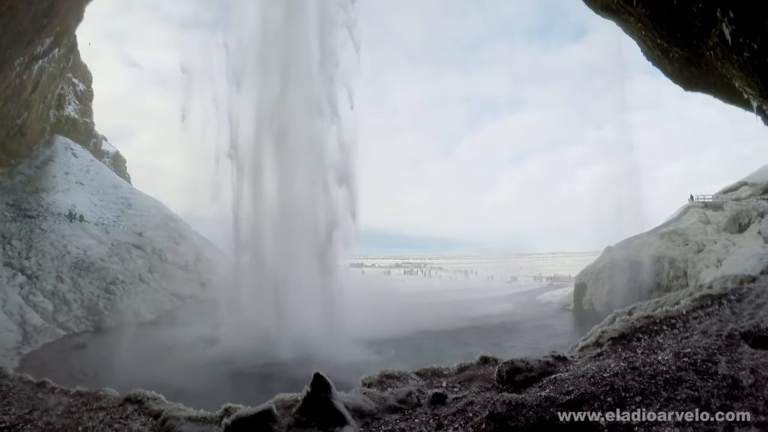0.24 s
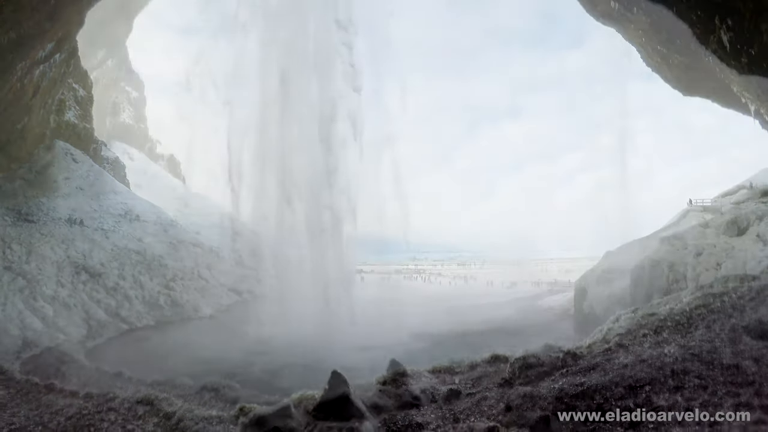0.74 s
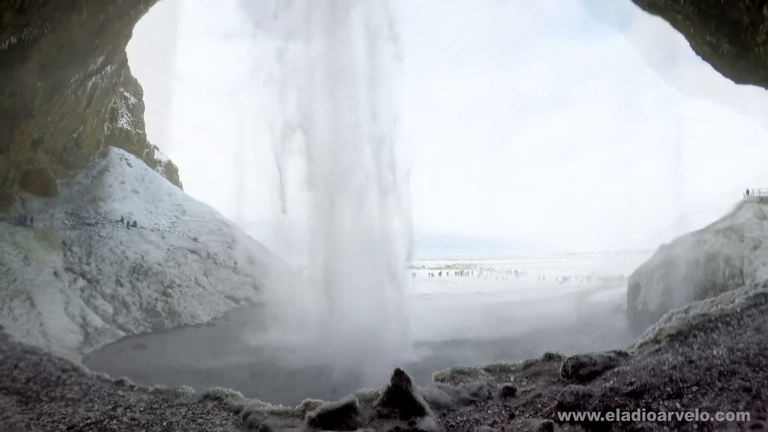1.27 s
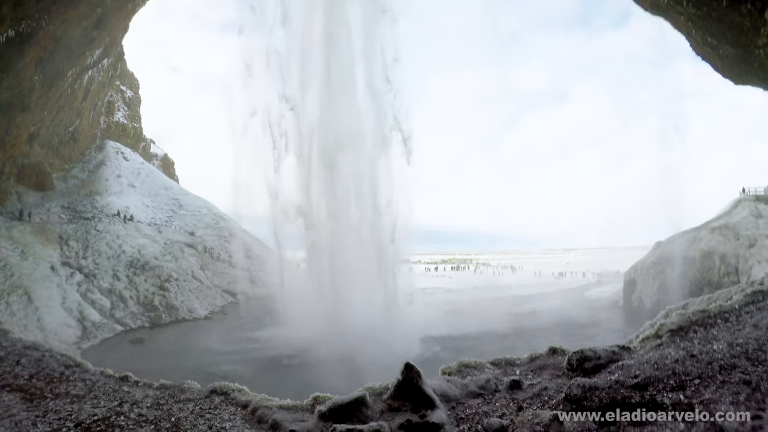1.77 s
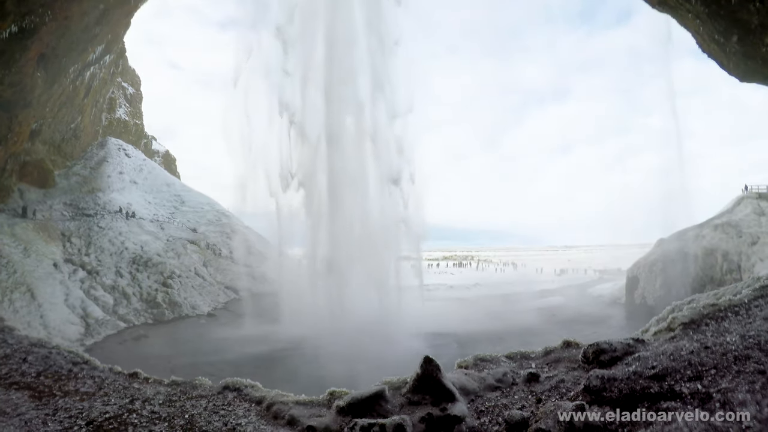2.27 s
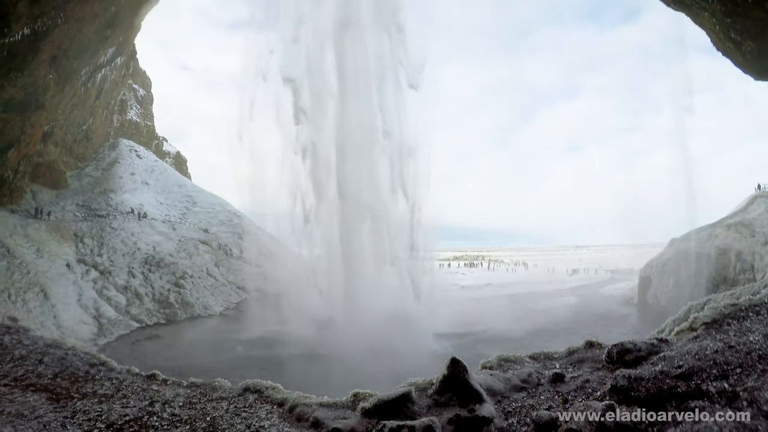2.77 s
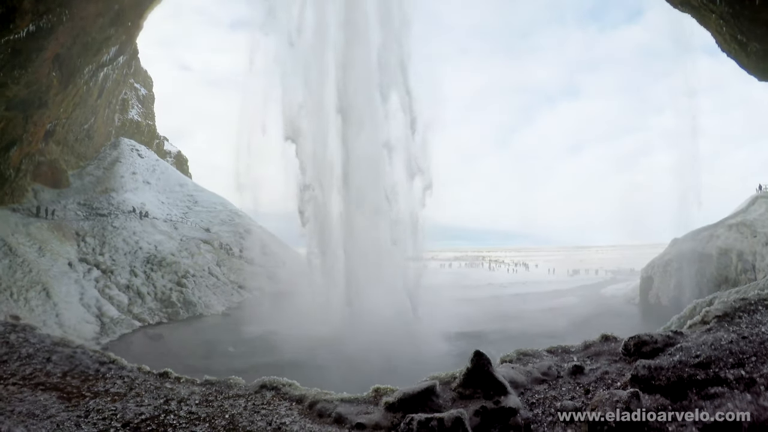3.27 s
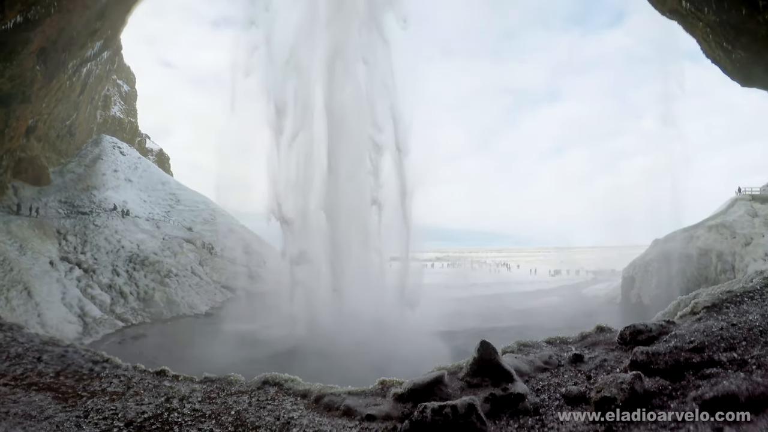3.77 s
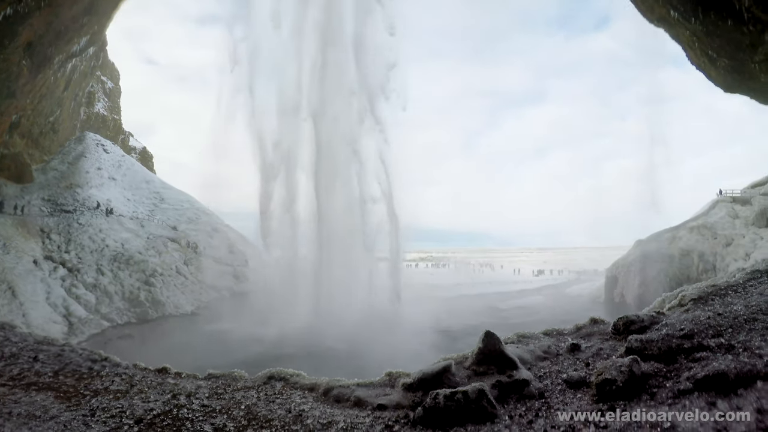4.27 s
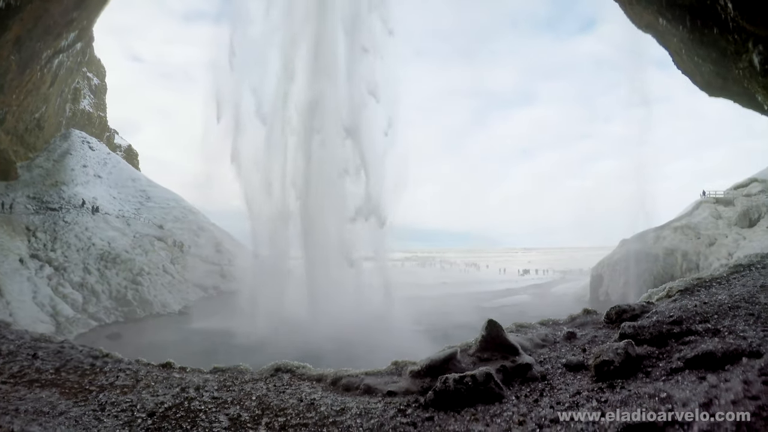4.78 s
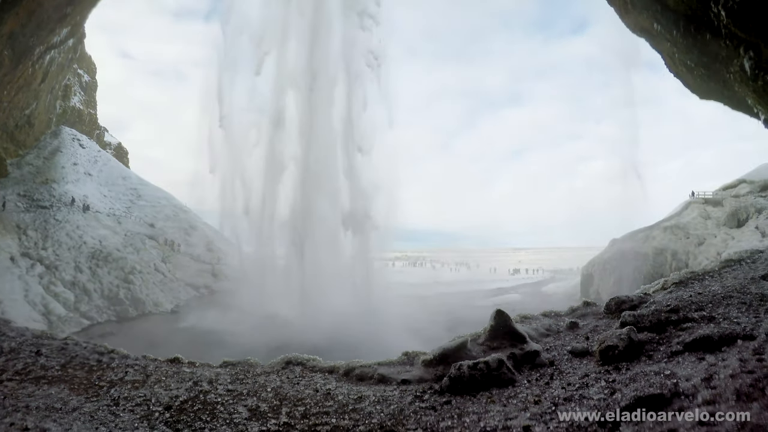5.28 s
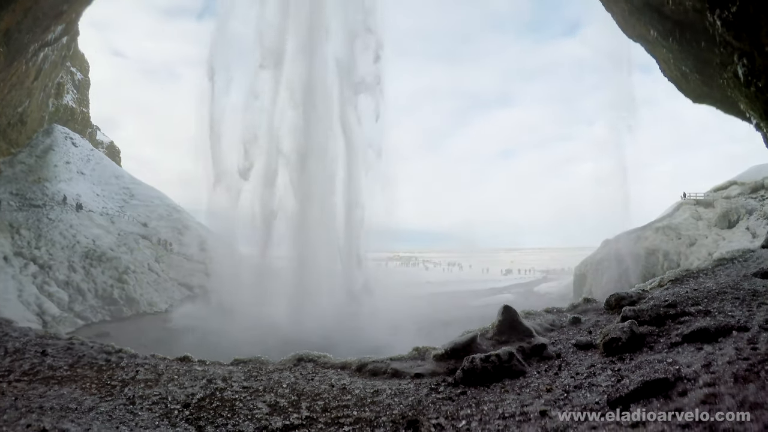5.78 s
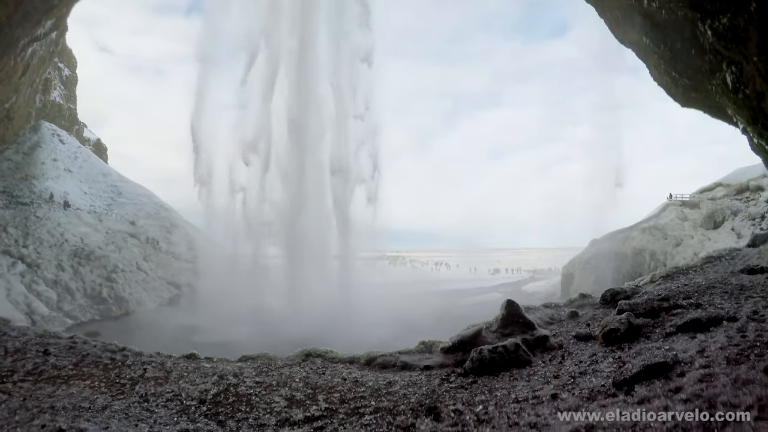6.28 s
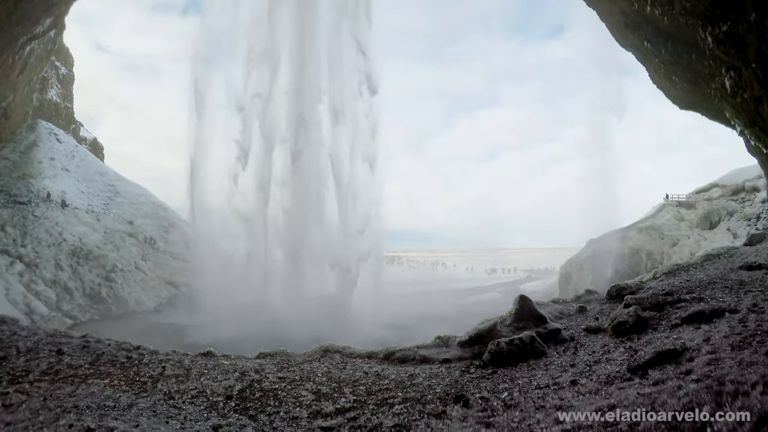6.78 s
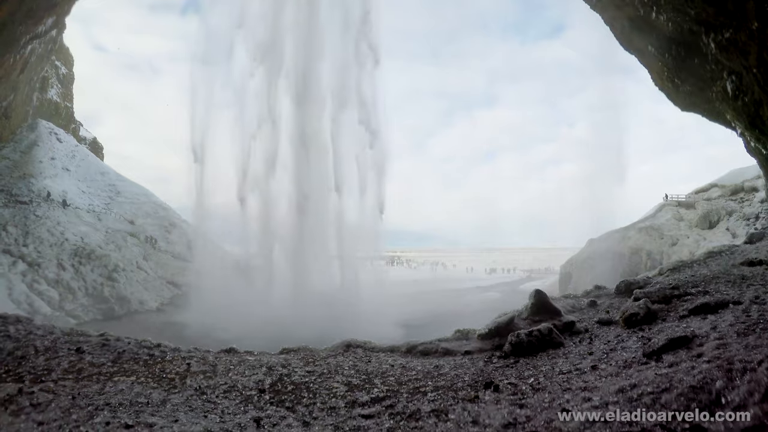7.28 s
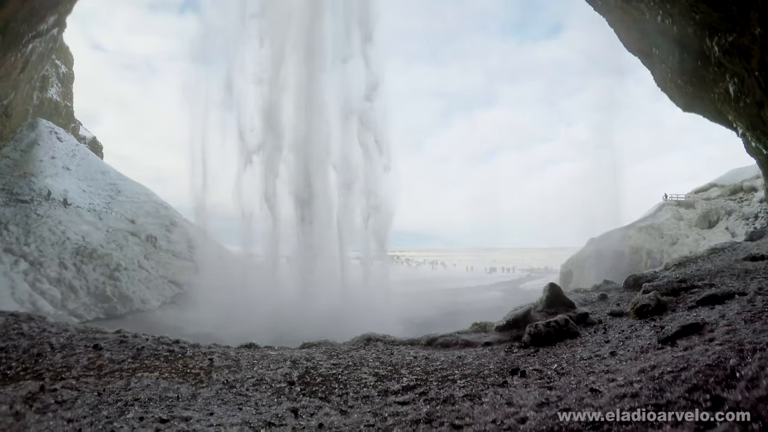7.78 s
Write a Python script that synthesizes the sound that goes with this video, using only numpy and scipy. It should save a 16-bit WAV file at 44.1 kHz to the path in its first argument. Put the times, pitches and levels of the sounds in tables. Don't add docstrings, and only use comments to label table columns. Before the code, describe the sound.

From a rocky hollow behind a tall waterfall, water pours without pause into a pool. Deep, boomy rumble dominates, thumping and churning irregularly, while a softer, steady rush and hiss lies above. Just before one second a drop knocks hard on the microphone's case; a big bass swell follows around two seconds. Sound is close, slightly muffled and channelled, mono, with little extreme treble.

```python
import sys
import numpy as np
from scipy import signal
from scipy.fft import rfft, irfft, next_fast_len
from scipy.io import wavfile
from scipy.ndimage import uniform_filter1d

SR = 44100
rng = np.random.default_rng(int(sys.argv[2]) if len(sys.argv) > 2 else 0)


def convert_level_to_amplitude(level_db):
    exponent = np.asarray(level_db, float) / 20
    return 10 ** exponent


def unload_audio(sound):
    columns = np.transpose(np.atleast_2d(sound))
    steps = np.round(np.clip(columns, -1, 1) * 32767)
    wavfile.write(sys.argv[1], SR, steps.astype(np.int16))


N = 354563
PADDED = next_fast_len(N)
HZ = np.maximum(np.fft.rfftfreq(PADDED, 1 / SR), 1)
CHANNEL_HZ = 48000 / 512

# [f/Hz, density/dB]
POOL_SPECTRUM = [(3.5, -27), (6.0, -6.5), (27, -1.5), (87, -3), (166, -12.5), (216, -11.5), (253, -16.5),
                 (313, -17), (400, -25.5), (520, -40), (880, -120)]
# [f/Hz, density/dB]
SHEET_SPECTRUM = [(820, -15.5), (1400, -1), (1520, -1), (3440, -4.5), (4040, -2.5), (6150, -4.5),
                  (6790, -6.5), (7660, -13), (8470, -15), (9640, -27), (11100, -30.5), (12600, -28),
                  (14700, -34), (15300, -38)]
# [f/Hz, level/dB]
CASE_RESPONSE = [(469, -3.5), (562, -16.5), (656, -8.5), (750, -3), (844, -2.5), (937, -4.5), (1031, -11),
                 (1125, -16.5), (1219, -6.5), (1312, -3), (1406, -.5), (1500, 0)]
# [t/s, peak level/dB]
CASE_DROPS = [
    (.738, -39),
    (.9075, -9),
    (2.53, -32),
    (2.793, -31),
    (6.526, -34),
    (6.949, -38),
]
# [f/Hz, width/Hz, level/dB]
HOLLOW_MODES = [
    (16.8, 7.7, -8.5),
    (52.8, 10, -7),
    (88.85, 7.9, -1),
    (143.3, 10.2, -13.5),
    (211, 28, -18.5),
]
# [t/s, flow level/dB, fineness/dB]
SHEET_FLOW = [(0, -29, 1.3), (.3, -28.5, 0), (.48, -31.5, 0.3), (.72, -31, 2.5), (.95, -28, -2),
              (1.4, -29.5, -0.5), (1.85, -30, -1), (2.6, -28.5, -2.5), (3.3, -29.5, -2), (3.8, -29.5, -2),
              (4.02, -30.5, -1), (4.25, -28.5, -2), (4.68, -29.5, -1), (4.9, -30, -2.5), (5.3, -30.5, -0.6),
              (6.1, -30.5, -1.3), (7.0, -30, -0.6), (8.04, -31, -2.7)]
# [t/s, weight/dB]
PLUNGE_WEIGHT = [(0, -0.5), (.9, 2), (2.5, 1.5), (3.4, 1.5), (4.1, -2), (4.9, 0.5), (6.2, -2), (7.2, -0.5),
                 (7.75, 3), (8.04, -1)]
# [mean level/dB, share of flow/1, share of fineness/1, share of weight/1]
SHEET_MIX = [
    (-39, 0.88, -0.11, 0.33),
    (-30.5, 0.95, 0.14, -0.011),
    (-31, .99, 0.77, 0.051),
    (-52.5, .9, 0.084, -.2),
]
# [centre f/Hz, mean level/dB, share of flow/1, share of weight/1]
POOL_MIX = [
    (38, -17, .11, -0.13),
    (87, -22.5, 0.099, -0.04),
    (167, -24, .11, 1.1),
    (310, -31.5, .3, 0.48),
]
# [t/s, pitch f/Hz, swell level/dB]
AIR_CLOUDS = [(.17, 310, 5), (.3, 38, 6), (.42, 87, 1.5), (.58, 310, 1), (.9, 130, 5), (1.36, 38, 3),
              (1.45, 200, 2.5), (1.75, 38, 3.5), (1.85, 310, 4.5), (2.08, 87, 10), (2.36, 109, 5),
              (2.68, 50, 0.5), (3.15, 38, 2), (3.37, 59.5, 7.5), (3.52, 87, -1), (4.04, 87, 2),
              (4.38, 38, 2), (4.72, 38, 5), (4.73, 310, 4), (4.85, 100, 3.5), (5.26, 38, 5),
              (5.55, 70, 1.5), (5.93, 55, -1), (6.42, 87, 5), (6.6, 310, 0), (6.9, 38, 3), (7.03, 87, 7.5),
              (7.3, 70, 7), (7.65, 87, 6), (7.9, 45, 7)]


def rms_one(x):
    return x / np.sqrt(np.mean(x ** 2) + 1e-20)


def in_time(rows):
    s, *columns = np.transpose(rows)
    return [np.interp(np.arange(N) / SR, s, column) for column in columns]


def at_hz(points, hz):
    table = np.array(points)
    return np.interp(np.log(hz), np.log(table[:, 0]), table[:, 1])


def shape(x, gain):
    return irfft(rfft(x, PADDED) * gain, PADDED)[:N]


def stepped(points, soft_hz):
    centre = np.maximum(np.round(HZ / CHANNEL_HZ), 1) * CHANNEL_HZ
    return uniform_filter1d(at_hz(points, centre), max(1, int(soft_hz * N / SR)))


def split(x, edges_hz):
    lows = [0] + [shape(x, 1 / (1 + (HZ / hz) ** 12)) for hz in edges_hz] + [x]
    return [rms_one(high - low) for low, high in zip(lows, lows[1:])]


def drift(rate_hz):
    step = 40
    r = np.exp(-80 * np.pi * rate_hz / SR)
    noise = rng.standard_normal(N // step + 2002)
    slow = signal.lfilter([1], [1, -2 * r, r * r], noise)[2000:]
    return np.interp(np.arange(N) / step, np.arange(len(slow)), rms_one(slow))


def patches(gain_db, edges_hz, rate_hz, own_db, shared_db):
    spectrum = rfft(rng.standard_normal(PADDED)) * convert_level_to_amplitude(gain_db)
    together = drift(rate_hz)
    out = 0
    for tent in np.eye(len(edges_hz)):
        weight = np.interp(np.log(HZ), np.log(edges_hz), tent)
        band = irfft(spectrum * weight, PADDED)[:N]
        out = out + band * convert_level_to_amplitude(own_db * drift(rate_hz) + shared_db * together)
    return out


def controls():
    return [c - c.mean() for c in in_time(SHEET_FLOW) + in_time(PLUNGE_WEIGHT)]


def pool_levels():
    swell_s, reach_octaves = 0.069, 0.44
    flow, _, weight = controls()
    t = np.arange(0, N, 100) / SR
    s, pitch_hz, swell_db = np.transpose(AIR_CLOUDS)
    bumps = np.exp(-.5 * ((t[:, None] - s) / swell_s) ** 2) * swell_db
    levels = []
    for hz, db, flow_share, weight_share in POOL_MIX:
        near = np.exp(-.5 * (np.log2(pitch_hz / hz) / reach_octaves) ** 2)
        swell = np.interp(np.arange(N) / SR, t, bumps @ near)
        levels.append(db + flow_share * flow + weight_share * weight + swell)
    return levels


def hollow(x):
    for hz, width_hz, db in HOLLOW_MODES:
        peak = 1 / (1 + (2 * (HZ - hz) / width_hz) ** 2)
        mode = shape(rng.standard_normal(PADDED), peak)
        x = x + convert_level_to_amplitude(db - 5.5 + 1.4 * drift(2.4)) * rms_one(mode)
    return x


def limiter(x):
    swell = uniform_filter1d(uniform_filter1d(x ** 2, 900), 900) / np.mean(x ** 2)
    return 0.98 * x / (swell + 0.18) ** 0.15


def pool():
    channelled = stepped(POOL_SPECTRUM, soft_hz=45)
    colour_db = np.where(HZ > 2.5 * CHANNEL_HZ, channelled, at_hz(POOL_SPECTRUM, HZ))
    colour_db = colour_db - np.clip(HZ - 445, 0, 100) * .4
    x = rms_one(patches(colour_db, np.geomspace(15, 420, num=14), rate_hz=3.57, own_db=2.5, shared_db=0.05))
    x = hollow(x)
    x = sum(convert_level_to_amplitude(db + .2) * band for db, band in zip(pool_levels(), split(x, [65, 110, 235])))
    return shape(limiter(x), 1 / (1 + (HZ / (5 * CHANNEL_HZ)) ** 30))


def sheet_levels():
    flow, fine, weight = controls()
    return [db + a * flow + b * fine + c * weight for db, a, b, c in SHEET_MIX]


def sheets():
    colour_db = at_hz(SHEET_SPECTRUM, np.maximum(HZ, 1500)) + stepped(CASE_RESPONSE, soft_hz=32)
    colour_db = colour_db - 60 * (HZ < 4.5 * CHANNEL_HZ)
    x = patches(colour_db, np.geomspace(500, 13000, num=12), rate_hz=11.4, own_db=0.26, shared_db=0.3)
    bands = split(x, [1300, 4000, 9500])
    bands[2] = bands[2] * convert_level_to_amplitude(0.31 * drift(16.0))
    return sum(convert_level_to_amplitude(db - 0.5) * band for db, band in zip(sheet_levels(), bands))


def drops():
    knock_hz, width_hz = 560, 600
    clicks = np.zeros(N)
    for s, db in CASE_DROPS:
        clicks[round(s * SR)] = convert_level_to_amplitude(db)
    r = np.exp(-np.pi * width_hz / SR)
    w = 2 * np.pi * knock_hz / SR
    knock = signal.lfilter([0, np.sin(w)], [1, -2 * r * np.cos(w), r * r], clicks + 1e-18)
    return -.15 * clicks - knock


def scene():
    return (pool() + sheets() + drops())[None]


def top_cut(x):
    return signal.sosfilt(signal.butter(12, 15260, fs=SR, output="sos"), x)


def record(dry):
    return top_cut(dry)


dry = scene()
out = record(dry)
unload_audio(out)
```